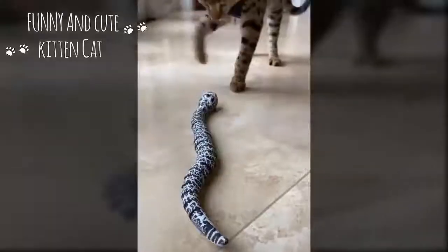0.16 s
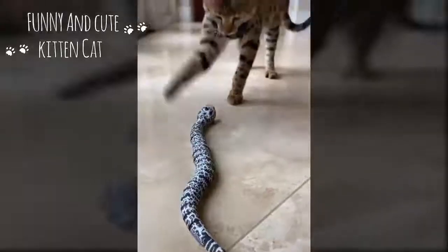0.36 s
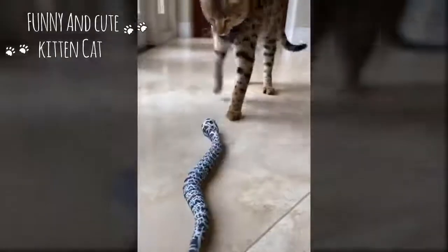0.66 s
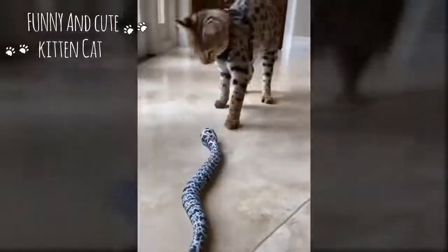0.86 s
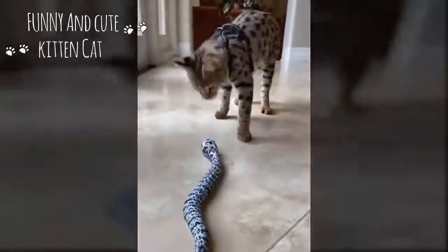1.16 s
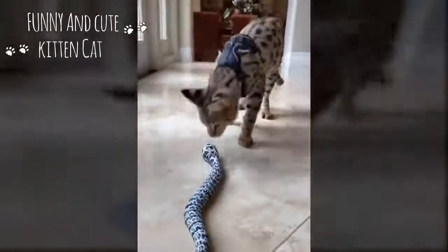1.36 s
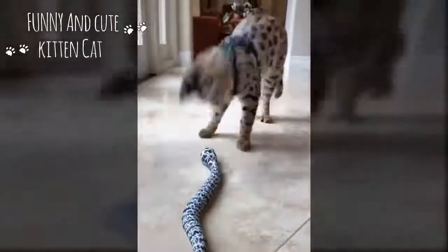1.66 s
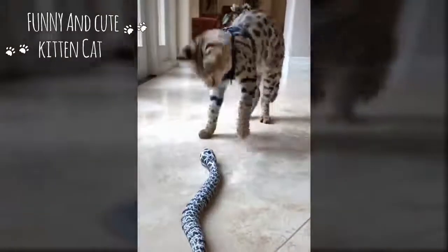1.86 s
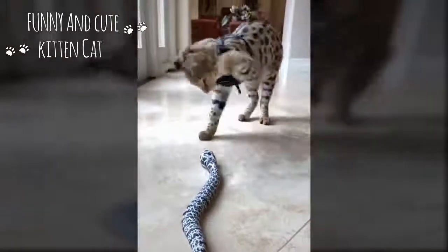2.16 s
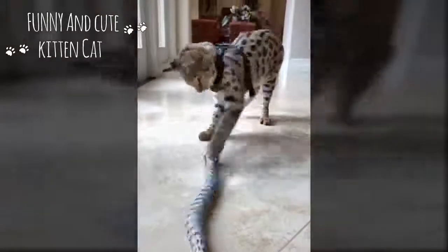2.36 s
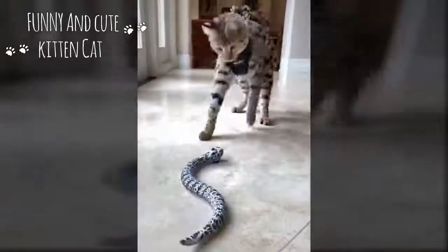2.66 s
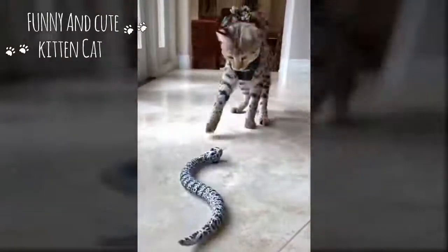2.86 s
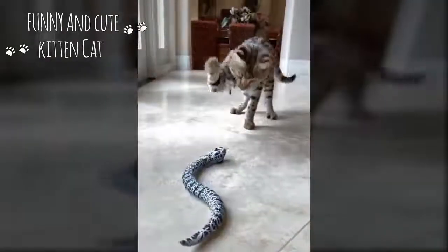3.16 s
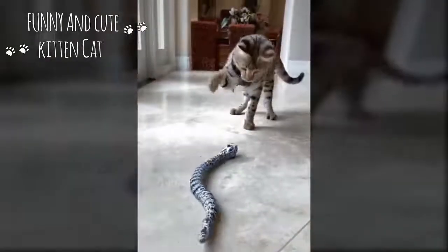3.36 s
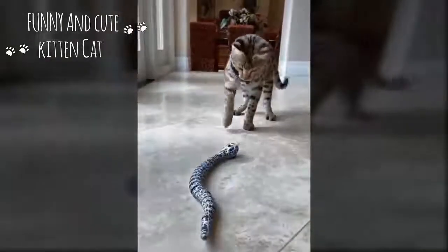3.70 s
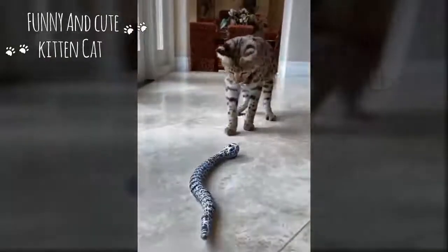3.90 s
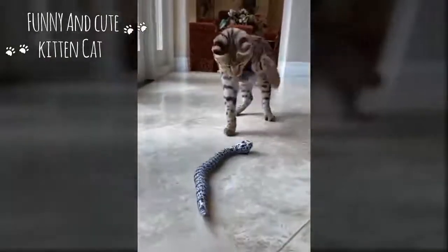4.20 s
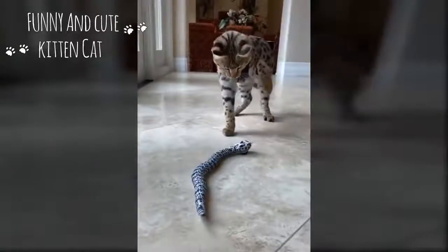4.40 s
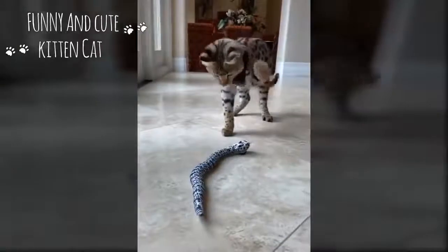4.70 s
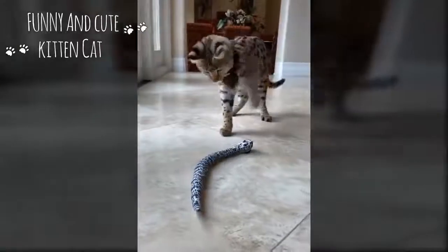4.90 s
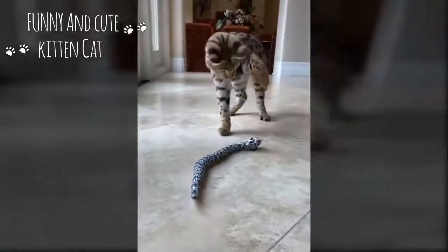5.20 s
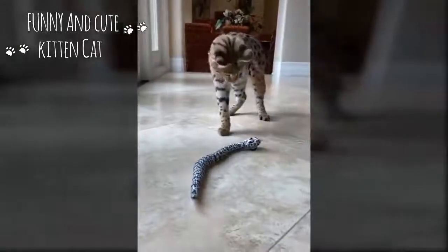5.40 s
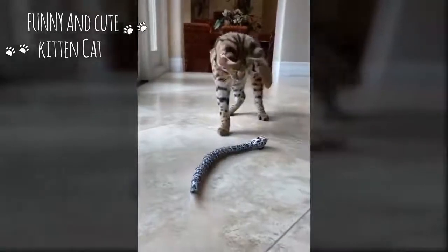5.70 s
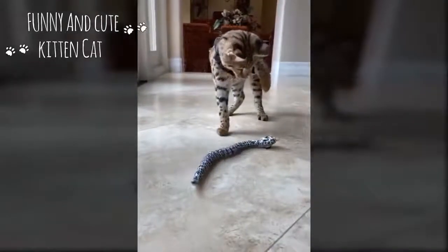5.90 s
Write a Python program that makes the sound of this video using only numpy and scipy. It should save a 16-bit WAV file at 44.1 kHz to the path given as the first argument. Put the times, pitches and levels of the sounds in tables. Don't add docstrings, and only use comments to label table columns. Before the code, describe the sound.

A cat spits twice while swatting a plastic motorized toy on stone in an echoing hall, then buttons click and the toy rattles in four short runs.

```python
import sys
import numpy as np
from scipy import signal
from scipy.fft import rfft, irfft, next_fast_len
from scipy.io import wavfile

SR = 44100
rng = np.random.default_rng(int(sys.argv[2]) if len(sys.argv) > 2 else 0)


def how_loud(loudness_db):
    steps = np.asarray(loudness_db, float) / 20
    return 10 ** steps


def generate_wav(signal):
    frames = np.transpose(np.atleast_2d(signal))
    scaled = np.clip(frames, -1, 1) * 32767
    pcm = np.round(scaled).astype(np.int16)
    wavfile.write(sys.argv[1], SR, pcm)


N = 266805

# [f/Hz, width/Hz, level/dB]
SHELL = [(3256, 460, -17), (4003, 284, 0.55), (4387, 97, -1.5), (4715, 90, 1), (5255, 240, -4)]
BELLY = [(2000, 1230, -3.5), (2480, 232, 6), (2860, 1180, -7.5)]
JOINTS = [(5710, 180, 0.2), (6530, 550, 2), (7440, 610, 2)]
WHEELS = [(8370, 356, 2.6), (9630, 1040, -4.5), (10150, 110, 0), (11100, 4200, -18)]


def rms_one(x):
    return x / np.sqrt(np.mean(x ** 2) + 1e-20)


def at_hz(points, hz):
    f, value = np.transpose(points)
    return np.interp(np.log(hz), np.log(f), value)


def drift(rate_hz):
    r = np.exp(-2 * np.pi * rate_hz / SR)
    slow = signal.lfilter([1], [1, -2 * r, r * r], rng.standard_normal(N + SR))
    return rms_one(slow[SR:])


def resonate(x, hz, width_hz):
    r = np.exp(-np.pi * width_hz / SR)
    feedback = [1, -2 * r * np.cos(2 * np.pi * hz / SR), r * r]
    return signal.lfilter(np.array([1, 0, -1]) * (1 - r * r) / 2, feedback, x + 1e-18)


def body(x, modes, patchy_db=0):
    out = 0
    for k, (hz, width_hz, db) in enumerate(modes):
        out = out + (-1) ** k * how_loud(db + patchy_db * drift(13)) * resonate(x, hz, width_hz)
    return out


def clicks(s, db):
    out = np.full(N, 1e-18)
    out[np.round(np.asarray(s) * SR).astype(int)] += how_loud(db)
    return out


def crack(s, db, decay_s):
    fall = signal.lfilter([1], [1, -np.exp(-1 / (decay_s * SR))], clicks(s, db))
    return fall * rng.standard_normal(N)


def ring(s, db, hz, t60_s):
    r, w = how_loud(-60 / (t60_s * SR)), 2 * np.pi * hz / SR
    return signal.lfilter([0, np.sin(w)], [1, -2 * r * np.cos(w), r * r], clicks(s, db))


def above(x, hz):
    return signal.sosfilt(signal.butter(4, hz, "high", fs=SR, output="sos"), x)


def below(x, hz):
    return signal.sosfilt(signal.butter(4, hz, "low", fs=SR, output="sos"), x)


def controls(tables):
    t, rows = np.arange(N) / SR, np.concatenate(tables)
    starts = np.array([table[0][0] for table in tables])
    ends = np.array([table[-1][0] for table in tables])
    gate = 0
    for start, end in zip(starts, ends):
        gate = gate + np.interp(t, [start, start + 0.00091, end, end + 0.061], [0, 1, 1, 0])
    which = np.clip(np.searchsorted(starts, t) - 1, 0, None)
    held = np.minimum(t, ends[which])
    return gate, which, [np.interp(held, rows[:, 0], column) for column in rows.T[1:]]


def house():
    # [f/Hz, level/dB per Hz]
    air_color = [(15, -35.5), (25, -3), (75, 1), (260, -9.5), (1360, -18), (4680, -27), (7920, -34),
                 (13400, -38)]
    # [f/Hz, width/Hz, level/dB]
    hum = [(65.9, 9.2, -70), (248.8, 6, -75.5)]
    hz = np.maximum(np.arange(N // 2 + 1) * SR / N, 1)
    air = irfft(rfft(rng.standard_normal(N)) * how_loud(at_hz(air_color, hz)), N)
    drone = sum(how_loud(db) * rms_one(resonate(rng.standard_normal(N), f, width)) for f, width, db in hum)
    return how_loud(-64.5) * rms_one(air) + drone


def rustle():
    # [peak t/s, rise/s, fall/s, bright level/dB, low relative level/dB]
    strokes = [(0.08, .1, 0.31, -74.5, 1), (0.632, .003, 0.051, -60, -9), (1.07, 0.032, 0.049, -77.5, 10),
               (1.2, .012, 0.011, -76, -14), (1.285, .006, .02, -67, -20), (1.715, 0.011, 0.014, -56, -10),
               (1.745, .006, 0.036, -70.5, 1), (1.46, .008, .006, -69, -20),
               (1.55, 0.049, 0.036, -69.5, -0.5), (1.63, 0.037, 0.033, -64, -1),
               (1.693, 0.017, 0.0091, -54.5, -16), (1.87, .05, 0.051, -66.5, -11),
               (6.014, 0.0078, 0.037, -58.5, -8.5)]
    bright = rms_one(body(rng.standard_normal(N), [(5430, 2300, -1.3), (9150, 1400, -0.05)], 1.0))
    low = rms_one(resonate(resonate(rng.standard_normal(N), 2000, 1500), 2000, 1500))
    t, out = np.arange(N) / SR, 0
    for s, rise_s, fall_s, db, low_db in strokes:
        bell = np.exp(-((t - s) / np.where(t < s, rise_s, fall_s)) ** 2)
        out = out + how_loud(db - 2.0) * bell * (bright + how_loud(low_db) * low)
    return out


def cat():
    # [t/s, breath level/dB, mouth opening/0-1]
    spits = [
        [(0.374, -52.5, 0.15), (0.394, -27.5, 0.66), (0.41, -38, 0.52), (0.438, -37, 0.47), (0.443, -23.5, .8),
         (0.462, -39.5, 0.38), (0.48, -48.5, 0.14), (0.51, -46.5, 0.45), (0.55, -75, 0.6)],
        [(2.297, -44.5, 0.17), (2.307, -26, 0.43), (2.341, -42, 0.57), (2.349, -31.5, 0.44),
         (2.418, -35.5, 0.42), (2.428, -28, 0.3), (2.44, -25, 0.57), (2.474, -38.5, 0.68), (2.56, -55, .45)],
    ]
    # [t/s, level/dB]
    pops = [
        (0.383, -39.5),
        (2.3, -35.5),
    ]
    # [t/s, level/dB, f/Hz, t60/s]
    paws = [
        (0.386, -49, 224, 0.052),
        (0.467, -48.5, 307, 0.016),
        (0.5037, -30.5, 2500, 0.021),
        (2.301, -39, 129, 0.051),
        (2.428, -54.5, 202, .04),
    ]
    # [f/Hz, width/Hz, level/dB]
    mouth = [(3400, 1700, -10.5), (3970, 280, 4), (4260, 370, 1.5), (5040, 1200, -1.5)]
    chest = [(355.6, 210, -9.5), (594, 130, -7.5), (1010, 370, -4.5), (1530, 230, 2)]
    throat = [(1940, 260, -8.5), (2300, 580, -0.6), (2740, 950, -2.5)]
    fangs = [(5610, 890, 8), (7300, 940, -6.5), (7450, 700, -7.5), (8000, 2000, -1), (9460, 1000, 0.5),
             (10500, 530, -21.5), (12100, 3800, -16)]
    air = how_loud(0.82 * drift(78)) * rng.standard_normal(N)
    gate, _, (breath_db, opening) = controls(spits)
    wide = np.clip(opening, 0, 1) - 0.5
    levels_db = 0, -17 - 8.5 * wide, -1.5 - 32 * wide, 0 - 1 * wide
    parts = [rms_one(body(air, part, 1.4)) for part in (mouth, chest, throat, fangs)]
    spit = gate * sum(how_loud(breath_db + db) * part for db, part in zip(levels_db, parts))
    pop_decay_s = 0.0069
    pop = signal.lfilter([1], [1, -np.exp(-1 / (pop_decay_s * SR))], clicks(*np.transpose(pops)))
    spit = spit + above(pop * parts[1], 800)
    return how_loud(-2.0) * spit + sum(ring([s], db, hz, t60_s) for s, db, hz, t60_s in paws)


def swats():
    # [t/s, peak level/dB, decay/s]
    slaps = [
        (0.385, -44, 0.0016),
        (0.3948, -21, 0.0018),
        (0.442, -14.5, 0.0016),
        (0.446, -35, .002),
        (0.451, -19.5, 0.0013),
        (2.426, -1.5, 0.00065),
        (2.4284, -6, 0.0016),
        (2.4322, -10, .0012),
    ]
    blows = sum(clicks([s], db + 1.5) + crack([s], db - 0.5, decay_s) for s, db, decay_s in slaps)
    return below(above(resonate(resonate(blows, 3700, 9000), 6000, 9500), 1400), 11000)


def ticks():
    # [t/s, peak level/dB, ring f/Hz, body relative level/dB, middle relative level/dB]
    taps = [(0.466, -35.5, 3400, -11, -5.5), (0.6251, -13.5, 5240, -28.5, -28),
            (1.1954, -58.5, 3800, -11, -24), (1.2683, -60, 9500, -5, -25), (1.2735, -17.5, 9350, -63, -58),
            (1.3095, -70, 3340, 5.5, -17), (1.4633, -58, 3770, -24, -16), (1.5126, -36.5, 7840, -19, -25),
            (1.5317, -31, 5800, -27, -17.5), (1.6106, -47, 5500, -18.5, -15),
            (1.703, -19.5, 5500, -58, -26.5), (1.7235, -58, 4360, -1, -4), (1.732, -20, 5700, -33, -30),
            (1.7418, -57.5, 3400, -1, -4), (2.1949, -32.5, 5230, -21, -13.5),
            (3.5642, -44, 4610, -46, -34.5), (5.2592, -35, 6950, -48, -36), (5.945, -44, 3400, -33, -6),
            (5.9805, -42, 6850, -35, -36), (6.001, -21.5, 6680, -39, -55)]
    s, db, hz, low_db, mid_db = np.transpose(taps)
    snap = clicks(s, db - 3.0) + crack(s, db - 8.0, 0.0024)
    out = above(resonate(resonate(snap, 7000, 7700), 7000, 7700), 3700)
    out += sum(ring([t], d - 6.0, f, 0.0065) for t, d, f in zip(s, db, hz))
    out += ring(s + 0.0011, db + low_db + 13.5, 703, 0.015)
    out += ring(s + 0.00062, db + low_db + 13.0, 1084, 0.011)
    middle = clicks(s, db + mid_db + 11.0) + crack(s, db + mid_db + 19.0, 0.0024)
    return out + resonate(middle, 1800, 1300)


def knocks():
    # [t/s, peak level/dB, brightness/dB]
    clacks = [(3.0881, -26, -14), (3.31, -20, -19), (3.1018, -14.5, -18), (3.1445, -18, -9),
              (3.1515, -16.5, -17), (3.1794, -15, -24), (3.245, -19, -3), (3.2562, -17.5, -16),
              (3.3016, -16.5, -11), (3.8751, -26, -5), (3.9213, -15.5, -9.5), (3.9519, -21.5, -2.5),
              (4.0068, -25, -1), (4.0397, -15, -17), (4.742, -24, -22), (4.7548, -21, -16),
              (4.7623, -16, -7.5), (4.7717, -17.5, -8), (4.7812, -18, -11.5), (4.8247, -28, -23),
              (4.9624, -24, -5), (5.0936, -23, -16), (5.609, -33, -3), (5.586, -28.5, 0), (5.61, -29, 3),
              (5.617, -31, -1), (5.6492, -20, -24), (5.675, -30, -13), (5.6942, -22, -6.5),
              (5.7202, -21, -11)]
    jerks = [
        (3.039, -38, -4),
        (3.816, -31, -12),
        (4.6994, -25, -15),
        (5.4697, -26, -34),
    ]
    tumbles = [
        (0.505, -30, -22),
        (2.534, -21, -17),
    ]
    s, db, bright_db = np.transpose(np.concatenate([clacks, jerks, tumbles]))
    dull = clicks(s, db) + crack(s, db + 2.5, 0.0016)
    bright = clicks(s, db + bright_db + 16.0) + crack(s, db + bright_db + 7.0, 0.0028)
    out = body(dull, SHELL, 1.4) + how_loud(-1.5) * body(dull, BELLY, 0.28)
    out = out + how_loud(-9.5) * body(dull, JOINTS) + body(bright, WHEELS)
    return below(out, 10900)


def rattle(tooth_db, scrape_db):
    teeth_per_s = 140
    turns = np.cumsum(teeth_per_s * how_loud(1.5 * drift(15)) / SR)
    s = np.flatnonzero(np.diff(np.floor(turns))) / SR
    teeth = crack(s, 2.25 * rng.standard_normal(len(s)), 0.0027)
    scrape = how_loud(scrape_db + 2.0 * drift(22.5)) * rng.standard_normal(N)
    return how_loud(tooth_db) * rms_one(teeth) + scrape


def motor_runs():
    # [t/s, load/dB]
    runs = [
        [(3.036, -51), (3.05, -52.5), (3.076, -49.5), (3.1, -36.5), (3.264, -39.5), (3.28, -41), (3.314, -41.5),
         (3.334, -42), (3.4, -57.5)],
        [(3.808, -63), (3.818, -57), (3.842, -53.5), (3.87, -41), (3.96, -43), (3.972, -42), (4.05, -36),
         (4.102, -49), (4.17, -51.5)],
        [(4.698, -47.5), (4.735, -48.5), (4.761, -32.5), (4.803, -42), (4.841, -37), (4.937, -50.5),
         (4.957, -38.5), (5.02, -49), (5.12, -54.5)],
        [(5.467, -47.5), (5.515, -53.5), (5.57, -45), (5.6, -34), (5.657, -45.5), (5.711, -34), (5.725, -43.5),
         (5.775, -42), (5.89, -64)],
    ]
    # [motor cut-out t/s, grip/dB, belly drag/dB]
    rolls = [
        (3.31, -0.5, 0.2),
        (4.098, -2.5, 0.5),
        (4.98, -0.5, 0.9),
        (5.74, -0.5, 1.2),
    ]
    # [level at full load/dB, share of the load's swing]
    parts = [(-36.5, 1.2), (-42, 0.61), (-45.5, 0.91), (-40.5, 0.5)]
    full_load_db, coast_db_per_s = -38, 236
    drive = rattle(0.22, 1.0)
    gate, which, (load_db,) = controls(runs)
    stop_s, grip_db, drag_db = np.transpose(rolls)[:, which]
    coast_db = grip_db - coast_db_per_s * np.maximum(np.arange(N) / SR - stop_s, 0)
    out = 0
    extras_db, bodies = (0, drag_db, 0, coast_db), (SHELL, BELLY, JOINTS, WHEELS)
    for (part_db, share), extra_db, modes in zip(parts, extras_db, bodies):
        level_db = part_db + share * (load_db - full_load_db) + extra_db
        out = out + how_loud(level_db) * rms_one(body(drive, modes, 1.53))
    return gate * out


def toy():
    return above(above(how_loud(-1.5) * motor_runs() + knocks(), 1700), 1700)


def buttons():
    # [t/s, peak level/dB, snap relative level/dB, thump relative level/dB]
    presses = [
        (3.005, -14, -18.5, 1.5),
        (3.716, -13, -22, .5),
        (4.549, -17, -23, 1),
        (5.307, -18.5, -25, .5),
    ]
    releases = [
        (3.172, -25.5, -8.5, -2.5),
        (4.054, -24.5, 10, -0.5),
        (5.068, -25, -1.5, .5),
        (5.635, -23, -9, -0.5),
        (5.858, -52, -5, -3),
    ]
    # [f/Hz, width/Hz, level/dB]
    press_modes = [(709, 109, -5), (996, 79, -4), (1446, 204, -8), (1917, 150, -1.5), (2324, 300, -16),
                   (3550, 1100, -43), (4425, 130, 7), (5700, 180, -2.5), (6200, 510, -3.5), (7200, 620, -4),
                   (8750, 1350, -13.5), (10060, 870, -17), (12700, 700, -30)]
    release_modes = [(432, 900, -8), (695, 81, 4.5), (999, 67, -0.5), (1360, 83, -8.5), (1743, 78, 5),
                     (1980, 140, 1.5), (2220, 324, -11), (4670, 430, -8), (6600, 1100, -14.5),
                     (8700, 1230, -23)]
    # [t/s, level/dB, f/Hz, t60/s]
    spring = [
        (3.008, -47, 2110, 0.13),
        (3.054, -36.5, 4570, 0.018),
        (5.645, -41, 730, 0.055),
        (5.862, -54, 703, 0.12),
        (6.003, -53, 1330, 0.054),
    ]
    out = 0
    # gain/dB, bounce/s, bounce/dB, buzz/dB
    kinds = ((presses, press_modes, 21.0, 0.00035, -8.0, 4.0),
             (releases, release_modes, 29.0, 0.0014, -6.0, -9.0))
    for events, modes, gain_db, bounce_s, bounce_db, buzz_db in kinds:
        s, db, snap_db, thump_db = np.transpose(events)
        blow = clicks(s, db + gain_db) + clicks(s + bounce_s, db + gain_db + bounce_db)
        blow = blow + crack(s, db + gain_db - 23, 0.0012)
        grip = how_loud(np.interp(np.arange(N) / SR, s, thump_db))
        out = out + body(grip * blow, modes[:3]) - body(blow, modes[3:])
        out += above(resonate(crack(s, db + snap_db + buzz_db, 0.0029), 6900, 6500), 5800)
    return out + sum(ring([s], db, hz, t60_s) for s, db, hz, t60_s in spring)


def hall(x):
    # [f/Hz, t60/s]
    decay = [(500, 1), (2500, 0.65), (5000, 0.62), (9000, 0.44), (13000, 0.26)]
    size = next_fast_len(N + SR)
    hz = np.maximum(np.arange(size // 2 + 1) * SR / size, 1)
    echo = 0
    for k, lag_s in enumerate(rng.uniform(0.01, 0.06, 20)):
        loop = how_loud(-60 * lag_s / at_hz(decay, hz)) * np.exp(-2j * np.pi * hz * lag_s)
        echo = echo + (-1) ** k * loop / (1 - loop)
    for lag_s in (0.0013, 0.0031, 0.0053):
        turn = np.exp(-2j * np.pi * hz * lag_s)
        echo = echo * (turn - 0.6) / (1 - 0.6 * turn)
    return irfft(rfft(x, size) * echo, size)[:N]


def scene():
    far = toy() + cat() + swats()
    switch = above(buttons(), 232)
    fingers = above(ticks(), 600)
    echoes = hall(how_loud(-26.0) * far + how_loud(-36.5) * switch + how_loud(-42.5) * fingers)
    return (far + switch + fingers + echoes + rustle() + above(house(), 38))[None]


def band_limit(x):
    return signal.sosfilt(signal.butter(12, 14260, fs=SR, output="sos"), x)


def record(dry):
    cut = signal.sosfilt(signal.cheby2(18, 28, 13350, fs=SR, output="sos"), dry)
    return band_limit(cut)


dry = scene()
out = record(dry)
generate_wav(out)
```